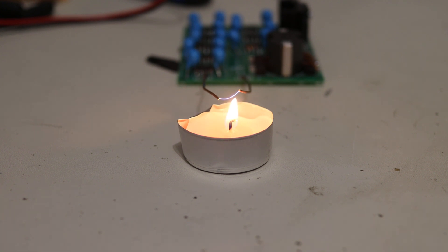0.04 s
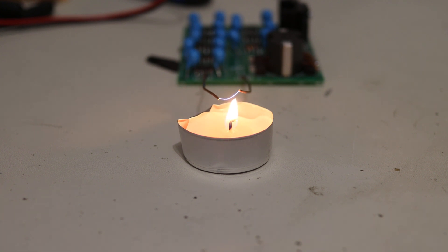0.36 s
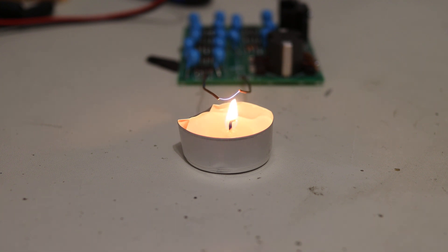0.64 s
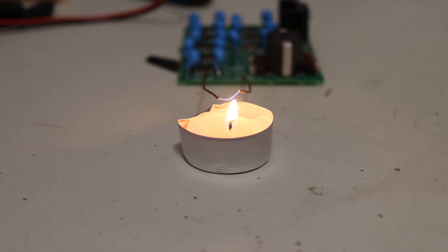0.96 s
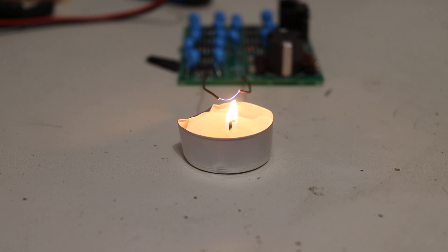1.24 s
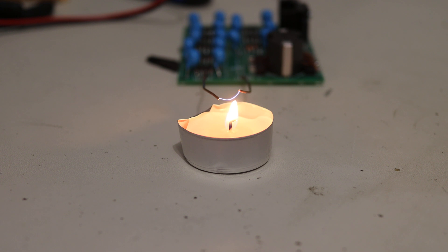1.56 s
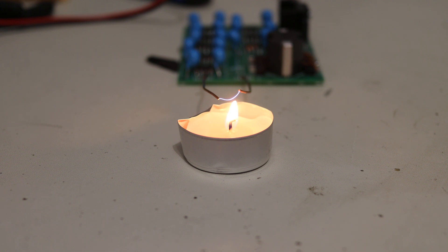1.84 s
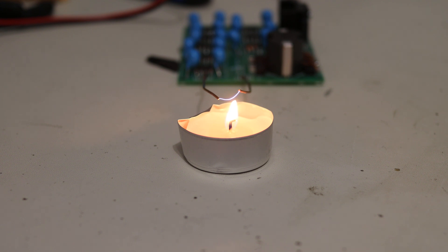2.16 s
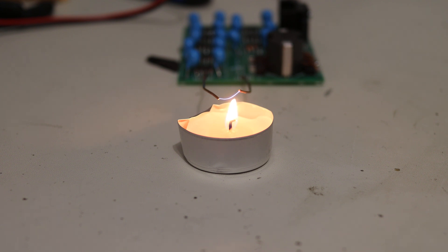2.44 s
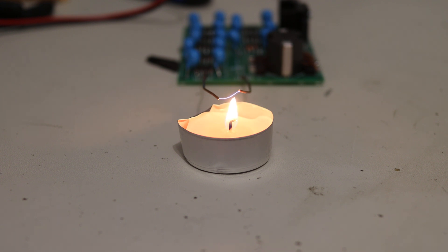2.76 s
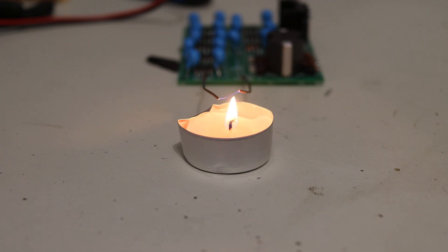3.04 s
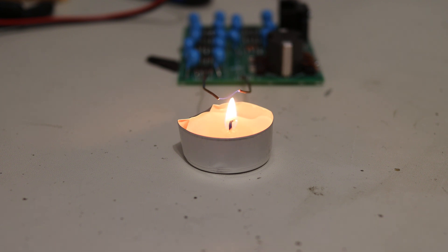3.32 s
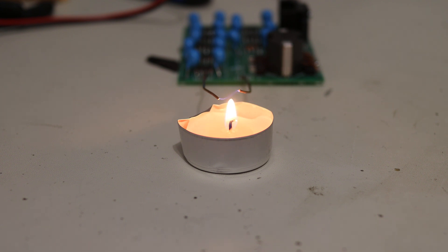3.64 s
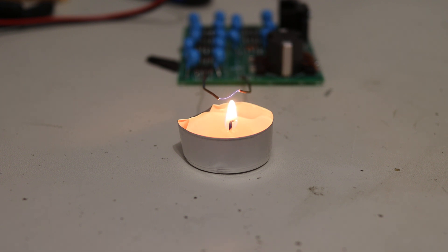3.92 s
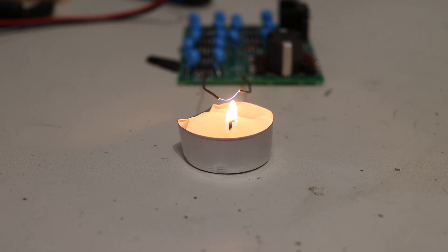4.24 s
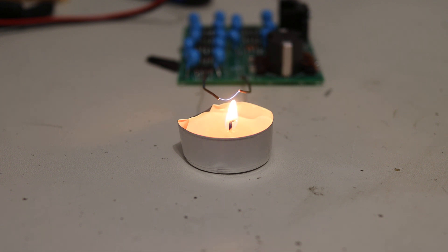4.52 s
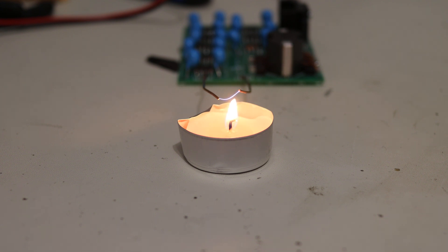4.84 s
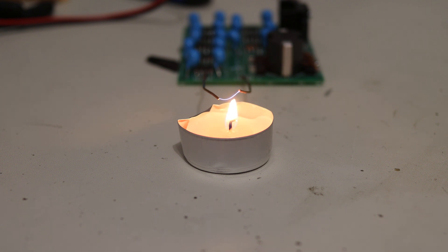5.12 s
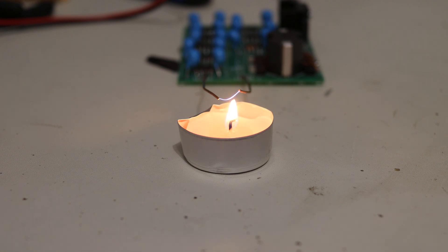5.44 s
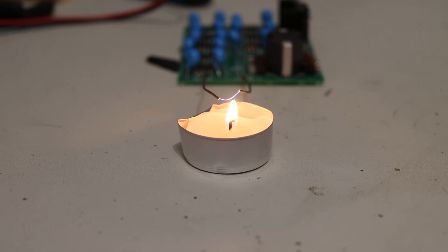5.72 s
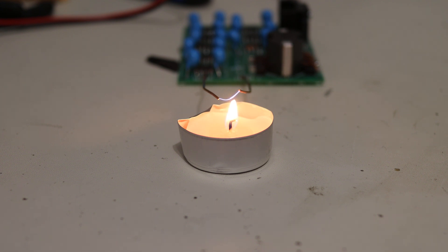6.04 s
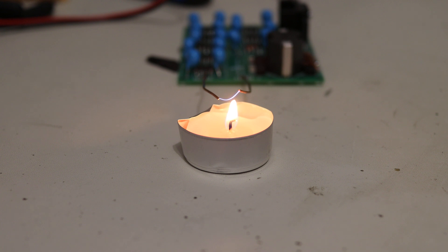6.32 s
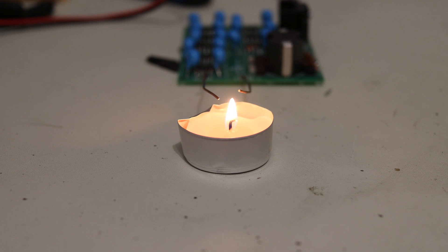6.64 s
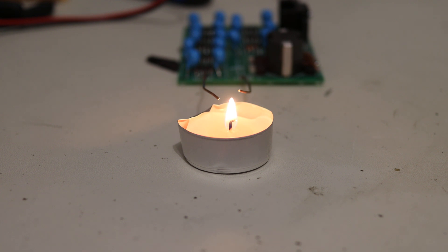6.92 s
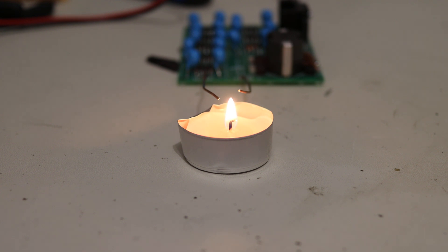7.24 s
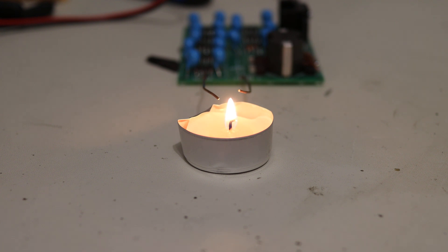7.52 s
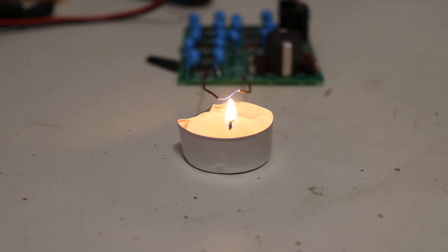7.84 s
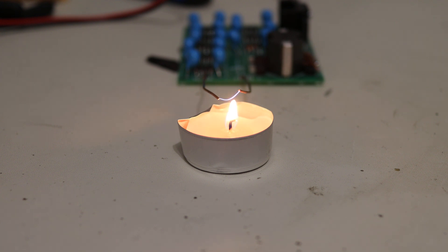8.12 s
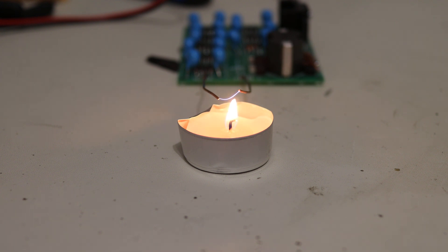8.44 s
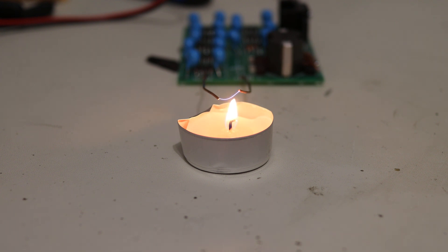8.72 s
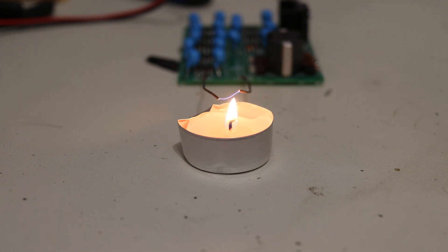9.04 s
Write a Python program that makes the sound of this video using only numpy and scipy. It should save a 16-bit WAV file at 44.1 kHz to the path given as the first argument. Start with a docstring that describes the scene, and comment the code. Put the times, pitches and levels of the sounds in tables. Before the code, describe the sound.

High-voltage sparks make a bright, wavering buzz in a small room, stopping for about a second before restarting.

```python
"""A small high-voltage generator sparks across two wires beside a candle flame, about 170-350 times a second.
The drifting flame changes the voltage a spark needs, so the buzz glides; it rasps when the sparks hop between a
long and a short path. Each crack bounces off the bench and nearby things into a small room where a fan hums.
The arc stops for a moment, two soft thumps sound, and the arc strikes again."""
import sys
import numpy as np
from scipy import signal
from scipy.fft import rfft, irfft, next_fast_len
from scipy.io import wavfile
from scipy.ndimage import uniform_filter1d

SR = 44100
rng = np.random.default_rng(int(sys.argv[2]) if len(sys.argv) > 2 else 0)


def bounce(signal):
    """Save signal as a 16-bit WAV file at the path given by the first command-line argument."""
    frames = np.transpose(np.atleast_2d(signal))
    limited = np.clip(frames, -1, 1)
    pcm = np.round(limited * 32767).astype(np.int16)
    wavfile.write(sys.argv[1], SR, pcm)


N = 404397
TIME = np.arange(N) / SR
# one crack and its echoes are built on these shorter time and frequency axes
ECHO_SIZE = 32768
ECHO_TIME, ECHO_HZ = TIME[:ECHO_SIZE], np.arange(ECHO_SIZE // 2 + 1) * SR / ECHO_SIZE


def gain(db):
    """Turn decibels into a multiplier."""
    return 10 ** (np.asarray(db) / 20)


def die_away(age, fade_s):
    """A fade that falls by 60 dB in fade_s seconds."""
    return np.exp(-np.log(1000) * age / fade_s)


def wander(per_s):
    """A random curve of size about 1 that turns per_s times a second."""
    knots = rng.standard_normal(int(N / SR * per_s) + 2)
    return np.interp(TIME * per_s, np.arange(len(knots)), knots)


def over_hz(points, size):
    """Join (Hz, value) points into a curve over the spectrum of size samples."""
    hz, value = np.transpose(points)
    return np.interp(np.log(np.arange(size // 2 + 1) * SR / size + 1), np.log(hz), value)


# When the generator is on. Each row: start in seconds, end in seconds.
ON_TIMES = [(0.001, 6.618), (7.9717, 9.2)]
def after_strike(decay_s):
    """Jumps by 1 each time the arc strikes, then dies away."""
    return sum((TIME + 1 / SR >= start) * np.exp(-np.abs(TIME - start) / decay_s) for start, _ in ON_TIMES)


# Spells when the flame disturbs the gap. Each row: start in seconds, end in seconds,
# share of sparks on the short path from 0 to 1, added jitter as a share of the wait between sparks.
RESTLESS_SPELLS = [(0, .198, .12, .005), (.214, .24, .65, .015), (.277, .5, .01, .012),
                   (.54, .84, .02, .009), (.93, 1.02, 0, .004), (1.12, 1.17, 0, .004),
                   (1.42, 1.58, 0, .008), (1.67, 1.78, 0, .005), (1.94, 2.03, 0, .01), (2.2, 2.37, 0, .007),
                   (2.72, 2.88, 0, .004), (2.959, 3.15, .8, .019), (3.15, 3.35, .9, .018),
                   (3.35, 3.43, .55, .018), (3.44, 3.77, .97, .013), (3.775, 4.0, .92, .01),
                   (4.02, 4.1, .45, .015), (4.11, 4.24, .15, .014), (4.62, 4.82, 0, .004),
                   (4.885, 4.96, .02, .014), (5.02, 5.2, .03, .012), (5.235, 5.44, .03, .011),
                   (5.52, 5.55, .5, .015), (5.57, 5.71, .04, .017), (5.77, 6.24, .08, .015),
                   (6.25, 6.49, .07, .014), (6.5, 6.62, 0, .009), (7.96, 8.01, .49, .025),
                   (8.04, 8.48, 0, .005), (8.5, 8.78, .14, .012), (8.79, 9.2, .25, .011)]
def restless_flame(attack_s=.02, release_s=.035):
    """The flame pushes sparks onto the short path and makes their timing uneven."""
    short_share, jitter = np.zeros((2, N))
    for start, end, share, added_jitter in RESTLESS_SPELLS:
        spell = np.interp(TIME, [start, start + attack_s, end, end + release_s], [0, 1, 1, 0])
        short_share = np.maximum(short_share, share * spell)
        jitter = np.maximum(jitter, added_jitter * spell)
    return short_share, jitter


# Brief spits in the buzz. Each row: time in seconds, extra level in dB, extra bass in dB.
SPIT_TIMES = [(.03, 2, 3), (.242, 2, 0), (3.435, 1, 4), (3.564, .5, 6), (3.788, .5, 11), (3.866, 0, 8),
              (4.024, 0, 11), (4.957, .5, 3), (5.19, 1.5, 3), (5.259, 1.5, 0), (5.536, .5, 4),
              (5.597, 1.5, 4), (5.871, 1, 6), (6.21, 1, 2), (6.488, 1, 3), (6.61, 1, 0), (8.891, 1, 0)]
def spits(ramp_s=.003):
    """A spark or two crack harder: gives the spit's strength from 0 to 1, its extra level and bass."""
    return sum(np.outer([1, db, bass_db], np.clip(2 - np.abs(TIME - at) / ramp_s, 0, 1))
               for at, db, bass_db in SPIT_TIMES)


# The buzz glides as the flame drifts. Each row: time in seconds, sparks a second on the long path.
SPARK_RATE = [(0, 273), (.21, 270), (.265, 237), (.32, 256), (.42, 236), (.5, 243), (.62, 243), (.95, 233),
              (1.3, 208), (1.62, 182), (1.85, 173), (2.05, 175), (2.2, 188), (2.42, 231), (2.68, 272),
              (2.95, 301), (3.03, 271), (3.22, 290), (3.41, 283), (3.46, 294), (3.53, 287), (3.58, 273),
              (3.73, 260), (3.79, 268), (3.9, 258), (4.03, 245), (4.29, 201), (4.4, 202), (4.61, 219),
              (5.02, 259), (5.2, 262), (5.55, 242), (5.9, 231), (6.26, 227), (6.62, 208), (7.97, 250),
              (8.1, 212), (8.26, 208), (8.38, 219), (8.58, 263), (8.78, 268), (9.1, 286)]
def spark_gap(drift_s=.035, middle_hz=243.5):
    """The flame and the time since striking set how fast, loud, uneven and deep the sparks are."""
    rate_hz = uniform_filter1d(np.interp(TIME, *np.transpose(SPARK_RATE)), int(drift_s * SR), mode="nearest")
    octaves = np.log2(rate_hz / middle_hz)
    short_share, flame_jitter = restless_flame()
    spit, spit_db, spit_bass_db = spits()
    # the buzz starts louder and rougher each time it strikes, then settles
    surge, just_struck = after_strike(decay_s=.036), after_strike(decay_s=1.0)
    jitter = .0036 + flame_jitter + .002 * just_struck + .03 * surge
    # faster sparks store less charge, so they are softer and thinner; hopping ones crack harder
    level_db = -.69 - 3.5 * octaves + 2.5 * short_share + 3 * just_struck + 4.5 * surge + spit_db
    bass_db = -8.5 * octaves - .5 * just_struck + spit_bass_db
    # a spit tends to throw the spark onto the other path
    short_share = short_share + .7 * spit * (1 - 2 * short_share)
    return rate_hz, level_db, jitter, short_share, bass_db


def sparks(rate_hz, level_db, jitter, short_share, short_speedup=1.21, stay_chance=.25):
    """One click each time the capacitor charges enough to jump the gap; the short path fires sooner."""
    scatter, dice = rng.standard_normal((4000, 2)), rng.random((4000, 2))
    # the flickering flame unsettles the timing in fits and pulls the rate about
    unrest = jitter * np.exp(.55 * wander(45))
    pull = .737 * wander(70)
    clicks, taps, k = np.zeros(N + 32), np.arange(-8, 9), 0
    for t, end in ON_TIMES:
        short, charge = False, 1
        while t < min(end, N / SR):
            now = int(t * SR)
            db = level_db[now] + (.37 + 12 * jitter[now]) * scatter[k, 0]
            click = np.sinc(now + taps - t * SR) * np.hanning(len(taps))  # can fall between samples
            # a longer wait stores more charge and cracks louder
            clicks[now + taps] += gain(db) * charge ** .45 * click
            # a spark may stay in the hot channel of the one before
            if dice[k, 0] > stay_chance:
                short = dice[k, 1] < short_share[now]
            charge = np.exp(unrest[now] * (scatter[k, 1] + pull[now]))
            t += charge / rate_hz[now] / (short_speedup if short else 1)
            k += 1
    return clicks[:N]


def spark_tone(clicks, bass_db, short_share, short_top_db=-2):
    """The bass changes from spark to spark, and the short path sounds a little duller."""
    def band_change(db, hz, kind):
        band = signal.butter(1, hz, kind, fs=SR, output="sos")
        return signal.sosfilt(band, clicks * (gain(db) - 1) + 1e-18)
    bass = band_change(bass_db, [210, 840], "bandpass")
    top = band_change(short_top_db * short_share, 11500, "highpass")
    return clicks + bass + top


def sharpest_click(gains):
    """The spectrum of the most sudden click with these gains (minimum phase)."""
    cepstrum = irfft(np.log(gains))
    half = len(cepstrum) // 2
    cepstrum[1:half] *= 2
    cepstrum[half + 1:] = 0
    return np.exp(rfft(cepstrum))


# The tone of one spark. Each row: frequency in Hz, relative level in dB.
CRACK_TONE = [(20, -41.5), (80, -23), (220, -27), (500, -20), (1000, -13), (1700, -9), (3000, -3),
              (4200, -4.5), (5600, -6), (9000, -9.5), (10500, -5.5), (11700, 1.5), (12700, -3),
              (14000, -19.5), (15300, -35.5)]
# Peaks and dips that colour the crack on the left and right.
# Each row: centre in Hz, width in Hz, left change in dB, right change in dB.
PEAKS_AND_DIPS = [(850, 600, 3, -.5), (1130, 150, -7, -4.5), (1380, 330, 3.5, 1.5), (1720, 150, -2, 0),
                  (2500, 150, -3, 0), (2780, 260, -1.5, -2.5), (3130, 250, 0, 1.5), (3200, 1300, -3, 0),
                  (3620, 180, -1.5, -2), (4080, 200, 2, 3.5), (4450, 400, 2.5, 0), (4950, 150, 3, 1),
                  (5170, 300, 3, 1), (5900, 200, 3, 0), (6650, 600, -2, 3), (7500, 600, -2, -5.5),
                  (8650, 500, -2, -3), (9850, 250, 6, -1), (12780, 260, 0, -6), (13080, 250, 2, 5),
                  (13520, 200, 0, -3), (14100, 800, 7, 5)]
def crack(boost_db=6):
    """The left and right spectrum of one spark's bright snap."""
    spark_db = over_hz(CRACK_TONE, ECHO_SIZE) + boost_db
    sides_db = sum(np.outer([left, right], np.exp(-(2 * (ECHO_HZ - hz) / width) ** 2))
                   for hz, width, left, right in PEAKS_AND_DIPS)
    return np.array([sharpest_click(gain(spark_db + db)) for db in sides_db])


# Echoes off the bench and the things around it.
# Each row: left delay in milliseconds, left level in dB, right delay in milliseconds, right level in dB.
BENCH_ECHOES = [(1.18, -9, 1.15, -12), (2.1, -14, 1.87, -16), (2.8, -17, 2.56, -18), (3.9, -9, 3.82, -12),
                (5.1, -17, 5.02, -18), (6.17, -12, 6.05, -14), (6.9, -13, 6.89, -16), (9.0, -20, 8.92, -18),
                (13.3, -18, 13.1, -22), (16.03, -21, 15.95, -21), (18.6, -17, 19.1, -20)]
def near_paths(treble_hz=3500, opening_hz=5300, opening_width_hz=1300):
    """The straight path and the first echoes, as a stereo spectrum."""
    def path(ms, db):
        return gain(db) * np.exp(-2j * np.pi * ECHO_HZ * ms / 1000)
    treble = 1j * ECHO_HZ / (treble_hz + 1j * ECHO_HZ)  # small things throw back only short waves
    left = 1 + treble * sum(path(ms, db) for ms, db, _, _ in BENCH_ECHOES)
    right = gain(1.5) + treble * sum(path(ms, db) for _, _, ms, db in BENCH_ECHOES)
    # the right microphone catches a bounce from close by, and its opening rings, delaying the treble
    right += path(ms=.08, db=-8)
    lag = np.exp(-2j * np.arctan2(opening_width_hz * ECHO_HZ, opening_hz ** 2 - ECHO_HZ ** 2))
    return np.array([left, right * lag])


# Notes of the bench, thin metal and circuit board.
# Each row: pitch in Hz, relative level in dB, seconds to fade by 60 dB.
RINGING_NOTES = [(204, -54, .4), (2170, -61, .25), (3045, -55.5, .34), (3630, -62, .27), (3905, -58.5, .4),
                 (3985, -58.5, .42), (4075, -60, .25), (4390, -59, .31), (4640, -59, .29)]
def ringing_parts(unrelated_hz=2000):
    """Parts ring faintly with each spark, high notes out of step left and right; a stereo spectrum."""
    turns = rng.random((len(RINGING_NOTES), 2, 1))
    ringing = 0
    for (hz, db, fade_s), turn in zip(RINGING_NOTES, turns):
        cycles = hz * ECHO_TIME + turn * min(hz / unrelated_hz, 1)
        ringing += gain(db) * die_away(ECHO_TIME, fade_s) * np.sin(2 * np.pi * cycles)
    return rfft(ringing)


# How alike left and right are. Each row: frequency in Hz, likeness from -1 (opposite) to 1 (the same).
STEREO_LIKENESS = [(60, 1), (130, 0.83), (290, 0.44), (640, 0.39), (1410, 0.034), (3100, -0.39),
                   (6820, -0.56), (15000, -0.89)]
def surrounding_noise(size):
    """White noise arriving from all around, as a stereo spectrum."""
    alike = np.clip(over_hz(STEREO_LIKENESS, size), -.99, .99)
    mid, side = rfft(rng.standard_normal((2, size)))
    return mid * np.sqrt((1 + alike) / 2) + np.array([[1], [-1]]) * side * np.sqrt((1 - alike) / 2)


def clutter(delay_s=.0008, fade_s=.0087, level_db=-4, treble_hz=3000):
    """The candle cup and the parts on the board scatter each crack's treble; a stereo spectrum."""
    age = ECHO_TIME - delay_s
    fade = (age > 0) * die_away(np.abs(age), fade_s)
    burst = irfft(surrounding_noise(ECHO_SIZE)) * fade / np.linalg.norm(fade)
    treble = 1j * ECHO_HZ / (treble_hz + 1j * ECHO_HZ)
    return gain(level_db) * rfft(burst) * treble ** 2


# The room's echo. Each row: band centre in Hz, seconds to fade by 60 dB, level in dB against the crack.
ROOM_BANDS = [(150, 0.89, 1), (492, 0.75, -3), (1400, 0.17, -3), (3800, 0.3, -3), (7700, 0.21, -1),
              (11450, 0.2, -1)]
def room_echo(build_s=.024):
    """Dense echoes build up and die away, each band at its own pace; a stereo spectrum."""
    noise, echo = surrounding_noise(ECHO_SIZE), 0
    for centre_hz, fade_s, db in ROOM_BANDS:
        band = over_hz([(hz, hz == centre_hz) for hz, _, _ in ROOM_BANDS], ECHO_SIZE)
        fade = (1 - np.exp(-ECHO_TIME / build_s)) * die_away(ECHO_TIME, fade_s)
        echo += gain(db) * irfft(noise * band) * fade / np.linalg.norm(fade)
    return rfft(echo)


def arc():
    """The buzz: every spark sends its crack along the near paths and out into the room."""
    snap, half = crack(), ECHO_SIZE // 2
    fade_out = np.minimum(1, np.linspace(2, 0, half))
    def heard(clicks, paths):
        response = irfft(snap * paths)[:, :half] * fade_out
        return signal.oaconvolve(clicks[None], response, axes=1)[:, :N]
    rate_hz, level_db, jitter, short_share, bass_db = spark_gap()
    clicks = sparks(rate_hz, level_db, jitter, short_share)
    clicks = spark_tone(clicks, bass_db, short_share)
    # in a restless gap each spark takes a new channel, so the sound flickers between two sets of echoes
    sway = np.tanh(jitter / .016) * wander(170)
    scattered = sum(heard(clicks * lean, clutter() + room_echo()) for lean in (np.cos(sway), np.sin(sway)))
    return heard(clicks, near_paths() + ringing_parts()) + scattered


# The tone of the room's air. Each row: frequency in Hz, relative level in dB.
AIR_TONE = [(15, -66), (25, -24), (88, -13), (125, -13), (165, -11.5), (278, -10), (345, -10.5), (438, -9),
            (501, -6.5), (580, -8.5), (680, -7.5), (879, -12), (1150, -14), (7000, -36.5), (12500, -40.5),
            (15000, -57)]
def room_air(level_db=-49):
    """A soft, low rush from all around."""
    size = next_fast_len(N)
    air = irfft(surrounding_noise(size) * gain(over_hz(AIR_TONE, size)), size)[:, :N]
    return air / air.std() * gain(level_db)


def wavering_tone(hz, db, waver_db=2.3, drift_hz=1.26):
    """A pure tone whose level and pitch wander a little."""
    level = np.sqrt(2) * gain(db + waver_db * wander(9.7))
    pitch_hz = hz + drift_hz * wander(9)
    return level * np.sin(2 * np.pi * np.cumsum(pitch_hz) / SR)


# The fan's hum. Each row: pitch in Hz, base level in dB.
FAN_HUM = [(91, -67.5), (230, -75), (296, -71), (324, -72), (479, -70), (630, -71)]
# The fan's strongest tone. Each row: time in seconds, pitch in Hz.
FAN_WHINE = [(6.7, 549), (7.3, 545), (7.6, 535), (8.0, 541)]
def fan(whine_db=-60.5):
    """A fan hums on several tones; the strongest sags a little in pitch."""
    hum = sum(wavering_tone(hz, db) for hz, db in FAN_HUM)
    return hum + wavering_tone(np.interp(TIME, *np.transpose(FAN_WHINE)), whine_db)


# Faint tones in the room. Each row: start in seconds, end in seconds, pitch in Hz, base level in dB.
PASSING_TONES = [(6.3, 6.87, 325, -66), (7.0, 7.13, 296, -68), (7.4, 7.8, 272, -68)]
def passing_tones(fade_s=.06):
    """Low tones fade in, hold and fade out."""
    return sum(wavering_tone(hz, db) * np.interp(TIME, [start - fade_s, start, end, end + fade_s], [0, 1, 1, 0])
               for start, end, hz, db in PASSING_TONES)


# The background's slow swell. Each row: time in seconds, level change in dB.
BACKGROUND_SWELL = [(6.6, -.5), (7.05, -2.6), (7.8, 0.5), (8.6, 1.5)]
def background():
    """Air, fan and faint tones dip and swell together."""
    swell = gain(np.interp(TIME, *np.transpose(BACKGROUND_SWELL)))
    return (room_air() + fan() + passing_tones()) * swell


# Soft thumps just before the arc restarts. # Each row: start in seconds, pitch in Hz, level in dB, seconds to
# fade by 60 dB.
SOFT_THUMPS = [(7.858, 540, -42, .16), (7.884, 215, -43, .14)]
def soft_thumps(push_s=.0028):
    """A soft thump rings briefly at a low pitch."""
    bumps = 0
    for start, hz, db, fade_s in SOFT_THUMPS:
        age = np.maximum(TIME - start, 0)
        envelope = (1 - np.exp(-age / push_s)) * die_away(age, fade_s)
        bumps += gain(db) * envelope * np.sin(2 * np.pi * hz * age)
    return bumps


def scene():
    """The arc over the quiet room, with two soft thumps in the pause."""
    return arc() + background() + soft_thumps()


def record(dry, top_hz=15400):
    """A steep filter cuts off the highest treble."""
    return signal.sosfilt(signal.ellip(8, .2, 70, top_hz, fs=SR, output="sos"), dry)


dry = scene()
out = record(dry)
bounce(out)
```